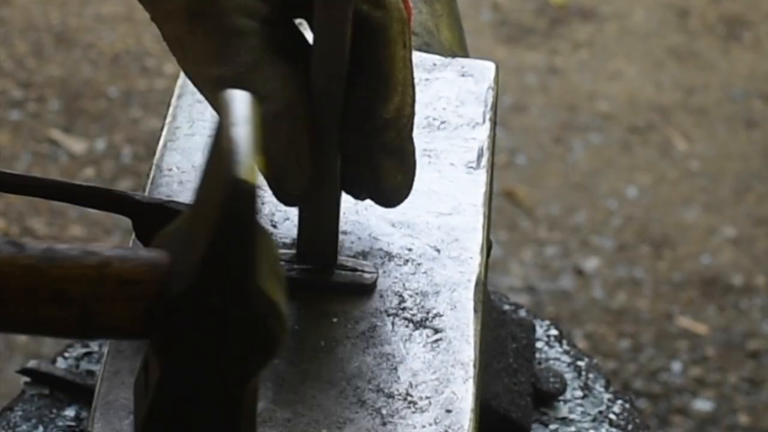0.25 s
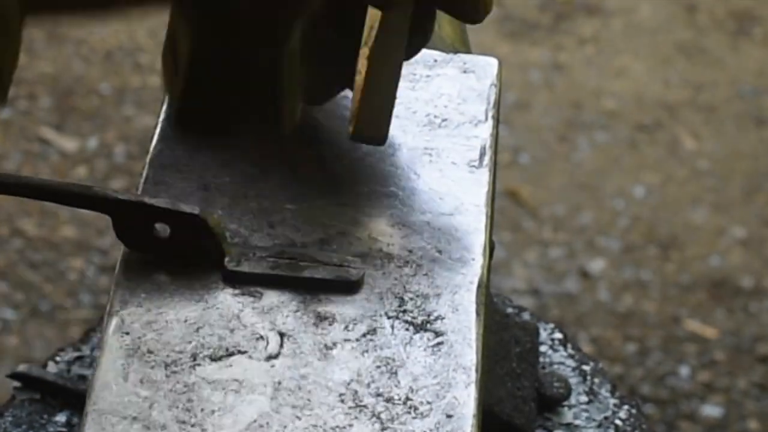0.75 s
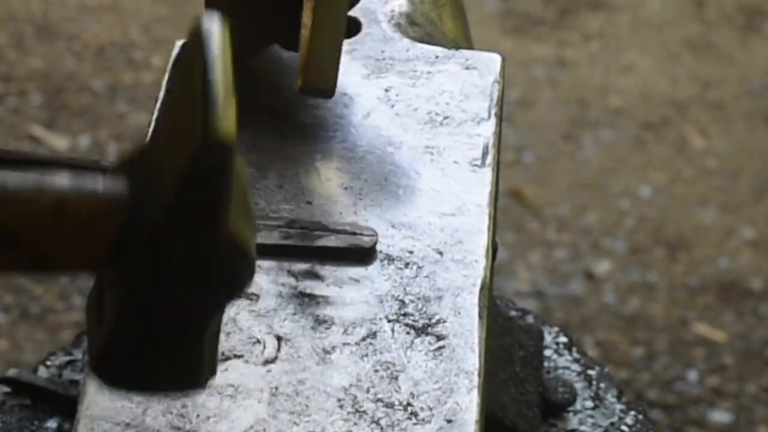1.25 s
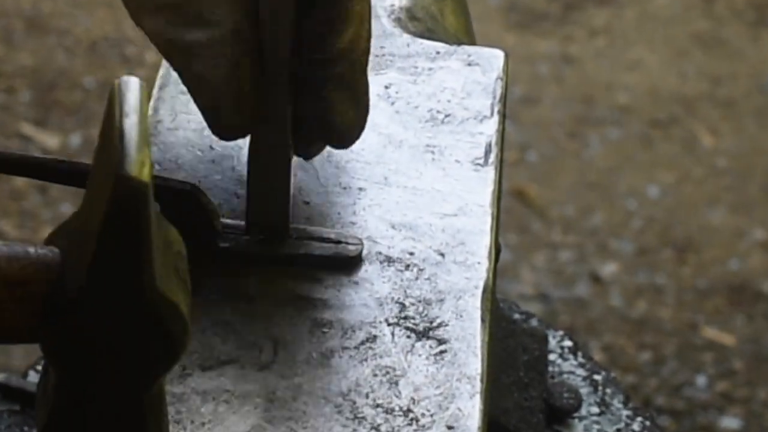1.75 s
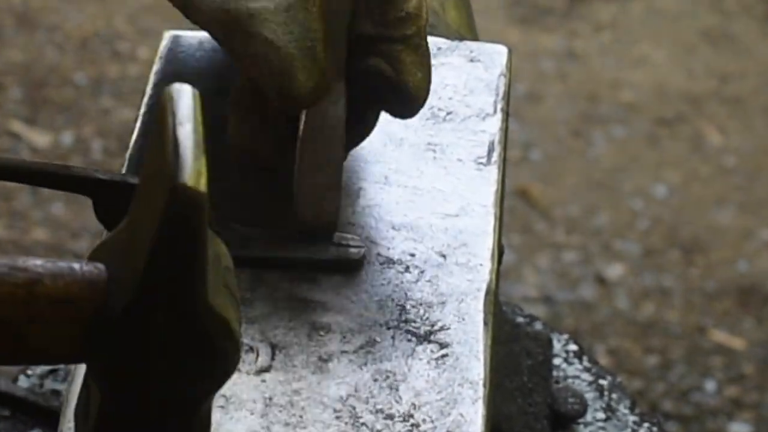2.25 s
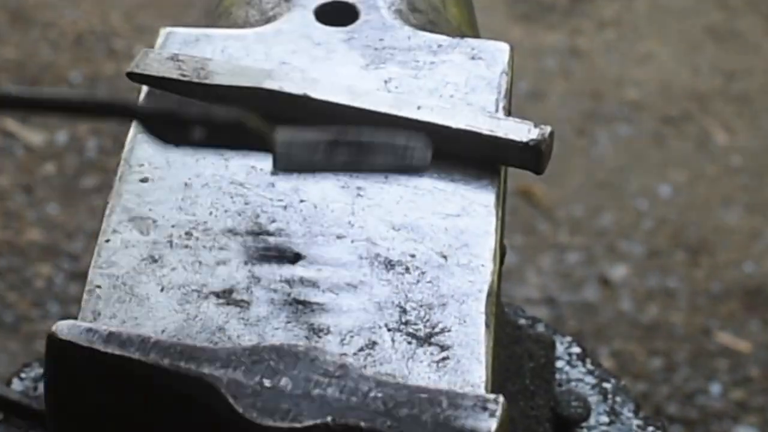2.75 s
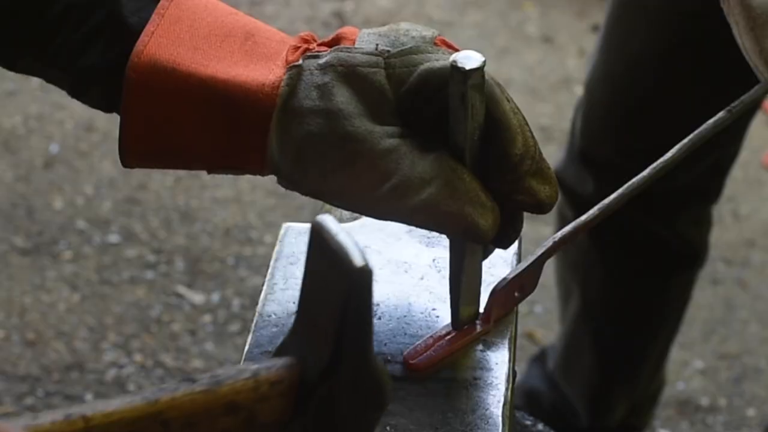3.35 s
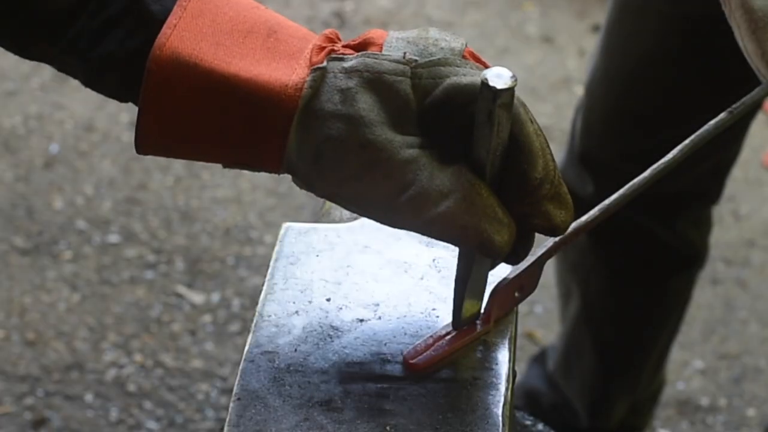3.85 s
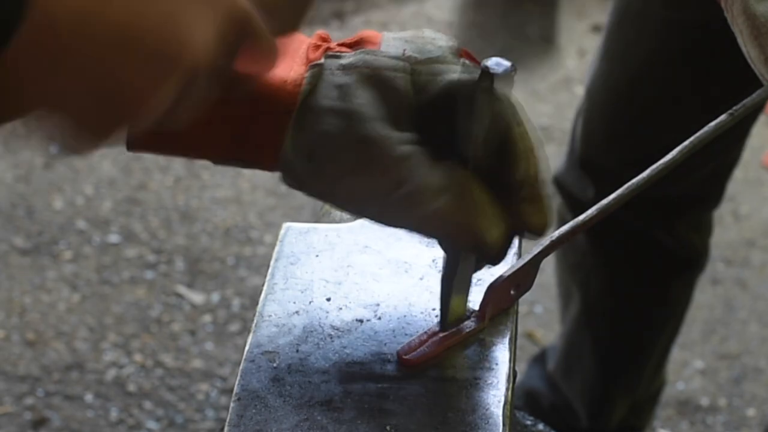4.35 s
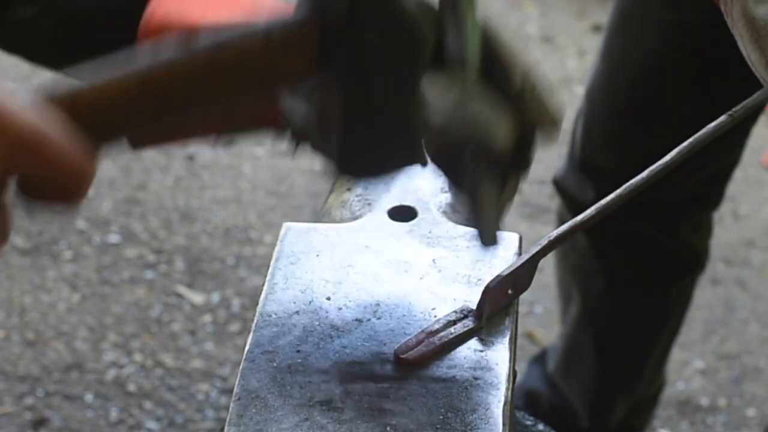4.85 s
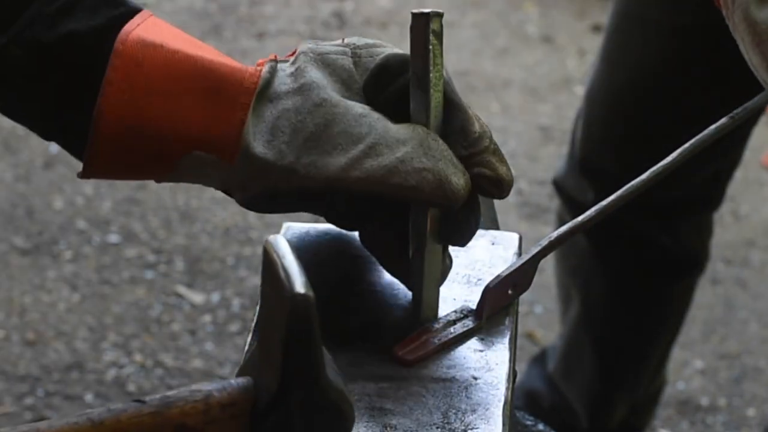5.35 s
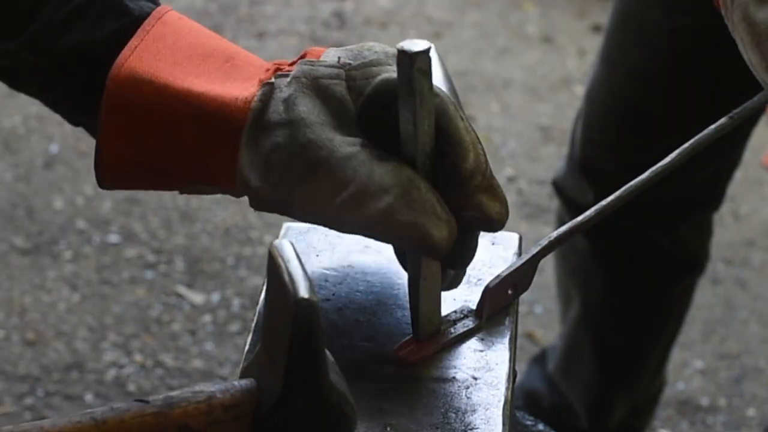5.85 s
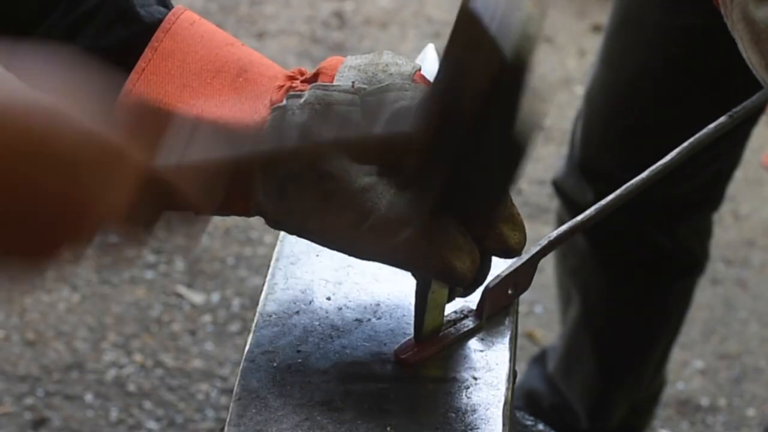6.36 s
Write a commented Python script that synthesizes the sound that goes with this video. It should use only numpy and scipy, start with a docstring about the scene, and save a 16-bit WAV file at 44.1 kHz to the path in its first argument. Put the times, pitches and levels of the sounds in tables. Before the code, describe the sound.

Over thin hiss, a smith taps a chisel and sets down clinking steel; over a low forge roar, three loud anvil strikes and hammer bounces follow.

```python
"""Hammer, hand chisel and anvil

A smith cuts a small steel piece: over hiss and a thin whine a rattle, then seven dry chisel blows, each with
rebounds, and a few clinks; over the forge's low roar three hard, ringing, clipped blows and a bouncing hammer.
Contacts are noise or pulse transients; rings are decaying modes and noise bands; backgrounds are shaped noise
plus unsteady tones."""
import sys
import numpy as np
from scipy import signal
from scipy.fft import rfft, irfft
from scipy.io import wavfile

SR = 44100
rng = np.random.default_rng(int(sys.argv[2]) if len(sys.argv) > 2 else 0)


def store_pcm(level_fs):
    """Save levels as 16-bit WAV."""
    pcm = np.round(np.clip(level_fs, -1, 1) * 32767).astype(np.int16)
    wavfile.write(sys.argv[1], SR, np.atleast_2d(pcm).T)


N = 290619
TIME = np.arange(N) / SR
RING_TIME = np.arange(int(.7 * SR)) / SR
LN_60DB = np.log(1000)

# Table levels are relative; the gains in the functions add to them.
# hammer and chisel modes: f/Hz, level in a hard blow/dB, level in a bounce/dB, t60/s
TOOL_MODES = [(2040, -24, -25, .3), (2110, -28, -26, .36), (2880, -21, -31, .35), (2950, -22, -33, .35),
              (3520, -36, -32, .35), (4312, -33, -34, .35), (5179, -36, -41, .35), (5630, -23, -42, .36),
              (6612, -12, -30, .32), (7020, -17, -56, .33), (8450, -32, -48, .25), (9400, -18, -52, .25),
              (9480, -12, -48, .25), (9570, -19, -51, .25), (9850, -22, -43, .25), (14260, -34, -48, .26)]
# anvil modes: f/Hz, level in a hard blow/dB, level in a bounce/dB, t60/s
ANVIL_MODES = [(690, -17, -38, .27), (740, -16, -33, .27), (818, -21, -30, .25), (1416, -29, -33, .35),
               (1857, -24, -29, .3), (6650, -17, -41, .3), (7610, -32, -52, .28), (7970, -24, -54, .28),
               (8231, -11, -51, .22), (8818, -20, -55, .22), (11245, -22, -53, .22), (11785, -16, -53, .16),
               (12690, -25, -53, .22), (12920, -23, -56, .22), (13220, -21, -53, .17),
               (14063, -16, -62, .17), (14870, -25, -64, .28), (15150, -21, -64, .18)]
# dense ringing after a light contact: f/Hz, level/dB per octave, t60/s
LIGHT_BODY = [(40, -68.5, 0.066), (180, -62.5, 0.025), (350, -32.5, 0.027), (695, -21, 0.026),
              (1400, -23, 0.046), (2817, -24.5, 0.049), (5000, -29.5, 0.056), (9000, -25.5, 0.042),
              (15000, -26, 0.026)]


def undb(db):
    """Decibels to gain."""
    return 10 ** (np.asarray(db) / 20)


def unit(x):
    """Scale to an rms of one."""
    return x / np.sqrt(np.mean(np.abs(x) ** 2))


def along(hz, table, axis=1):
    """Interpolate a table column on a log-frequency axis."""
    rows = np.array(table, float)
    log_hz = np.log(np.maximum(hz, 1))
    return np.interp(log_hz, np.log(rows[:, 0]), rows[:, axis])


def add(track, s, sound):
    """Mix a sound into the track at time s."""
    start = max(int(s * SR), 0)
    track[start:start + len(sound)] += sound[:N - start]


def wander(t, rate_hz):
    """Complex random signal of rms one, interpolated between rate_hz knots a second."""
    knots = np.arange(0, t[-1] + 2 / rate_hz, 1 / rate_hz)
    re, im = rng.standard_normal((2, len(knots)))
    return unit(np.interp(t, knots, re + 1j * im))


def low_cut(x, hz):
    """Second-order high-pass; removes the bass below hz."""
    return signal.sosfilt(signal.butter(2, hz, "high", fs=SR, output="sos"), x)


def swell(rise_s):
    """Exponential build-up of reflections."""
    return 1 - np.exp(-RING_TIME / rise_s)


def dense_ring(table, tilt_db_per_octave=0):
    """Countless overlapping modes: half-octave-spaced noise bands, each dying at its own rate."""
    size = len(RING_TIME)
    noise = rfft(rng.standard_normal(size))
    octave = np.log2(np.maximum(np.fft.rfftfreq(size, 1 / SR), 1))
    out = 0
    for hz in 1000 * 2 ** np.arange(-5, 4.5, .5):
        share = np.maximum(1 - 2 * np.abs(octave - np.log2(hz)), 0)
        band = unit(irfft(noise * share, size))
        level_db = along(hz, table) + tilt_db_per_octave * np.log2(hz / 2000)
        fade = np.exp(-LN_60DB * RING_TIME / along(hz, table, axis=2))
        out = out + band * undb(level_db) * fade
    return out / np.sqrt(3)  # overlapping bands: unit power per octave at 0 dB


def ring(modes, scatter=0, scatter_rate_hz=70):
    """Sum of decaying modes (f/Hz, level/dB, t60/s); reflections make each flutter by the share scatter."""
    out = 0
    for hz, db, t60_s in modes:
        phase = np.exp(2j * np.pi * rng.random())
        flutter = (phase + scatter * wander(RING_TIME, scatter_rate_hz)) / np.hypot(1, scatter)
        mode = np.exp((2j * np.pi * hz - LN_60DB / t60_s) * RING_TIME)
        out = out + undb(db) * np.imag(flutter * mode)
    return out


def excited(modes, axis, tilt_db_per_octave=0):
    """Pick the levels for one kind of blow; a harder contact favours the high modes."""
    return [(row[0], row[axis] + tilt_db_per_octave * np.log2(row[0] / 2000), row[-1]) for row in modes]


def colour(push, spectrum):
    """Filter a push with the minimum-phase response of a spectrum; unit energy."""
    size = 2048
    gain = undb(along(np.fft.rfftfreq(size, 1 / SR), spectrum))
    cepstrum = irfft(np.log(gain))
    # fold the cepstrum so that the response is causal
    cepstrum[1:size // 2] *= 2
    cepstrum[size // 2 + 1:] = 0
    response = irfft(np.exp(rfft(cepstrum)))[:size // 2]
    out = np.convolve(push, response)
    return out / np.sqrt(np.sum(out ** 2))


def crack(length_s):
    """Steel chatters on steel: a brief burst of random signs, coloured."""
    # first contact: f/Hz, level/dB
    spectrum = [(30, -14), (150, -8.5), (400, 5), (700, 1.5), (1400, -10), (3000, -1), (7000, -1),
                (15000, -2.5)]
    t = RING_TIME[:256]
    chatter = np.sign(rng.standard_normal(len(t)))
    return colour(chatter * np.exp(-(t / length_s) ** 4), spectrum)


def rattle(s, hop_s, db, count=4):
    """Contacts (t/s, level/dB) of a rebound: every hop is shorter, every contact weaker."""
    hop_share, hop_loss_db = .55, 4.0
    for k in range(count):
        yield s, db - k * hop_loss_db
        s = s + hop_s * hop_share ** k


def background(spectrum, db, resonances, tones, waver, low_hz):
    """Rushing air, coloured by resonances, with slightly unsteady tones."""
    hz = np.fft.rfftfreq(N, 1 / SR)
    shape_db = along(hz, spectrum)
    for f, width_hz, gain_db in resonances:
        shape_db = shape_db + gain_db / (1 + (2 * (hz - f) / width_hz) ** 2)
    noise = irfft(rfft(rng.standard_normal(N)) * undb(shape_db), N)
    air = unit(low_cut(noise, low_hz))
    out = air * undb(db + 0.58 * wander(TIME, rate_hz=19).real)
    for f, tone_db in tones:
        unsteady = 1 + waver * wander(TIME, rate_hz=16)
        out = out + np.sqrt(2) * undb(tone_db) * np.real(unsteady * np.exp(2j * np.pi * f * TIME))
    return out


def hiss():
    """Shaped noise and a thin whine of three tones."""
    # noise: f/Hz, level/dB per Hz
    spectrum = [(60, -54.5), (150, -28), (240, -17), (400, -11.5), (510, -5), (750, -4.5), (1100, -9.5),
                (1900, -8.5), (2600, -3.5), (3300, -10.5), (6000, -15), (9000, -17), (12500, -24.5),
                (15500, -26)]
    # resonances: f/Hz, width/Hz, gain/dB
    resonances = [(2440, 200, 2.5), (2950, 380, 4.2), (3750, 400, 7.5), (3900, 120, 2), (5080, 420, 8),
                  (6160, 270, 4.4), (10100, 200, 4.85), (10600, 190, 4.3)]
    # whine: f/Hz, level/dB
    tones = [(959, -57.5), (2826, -52.5), (8484, -61)]
    return background(spectrum, -46.2, resonances, tones, waver=0.25, low_hz=159.6)


def forge_roar():
    """Low shaped noise of the forge and the tones of its blower."""
    # noise: f/Hz, level/dB per Hz
    spectrum = [(15, -46), (25, -15.5), (112, -5.5), (243, -10), (354, -4.5), (558, -13.5), (790, -10),
                (927, -19.5), (1030, -12.5), (1150, -22), (1280, -15.5), (1630, -25), (2070, -24.5),
                (2300, -29), (15000, -54)]
    # resonances: f/Hz, width/Hz, gain/dB
    resonances = [(304, 27, 5.5), (481, 40, 6), (1221, 25, 3), (1730, 35, 4), (2020, 80, 3), (2920, 200, 5),
                  (6900, 1200, 0), (9800, 1770, 5), (14500, 3600, -5.5)]
    # blower: f/Hz, level/dB
    tones = [(118.4, -56), (354, -50.5), (501, -55.5), (1061, -53)]
    return background(spectrum, -42.7, resonances, tones, waver=0.28, low_hz=25)


def clinks():
    """The loose chisel touches the anvil and rings in two high modes; brushing steel only pings."""
    # touches: t/s, tick/dB, ring/dB
    touches = [(2.779, -15.5, -47), (2.793, -18, -43), (2.802, -10, -30), (2.8736, -21, -32),
               (2.879, -15, -26)]
    # loose chisel: f/Hz, level/dB, t60/s
    loose_modes = [(7140, -1.5, .035), (13900, 2, .04)]
    # faint pings of steel brushing steel: t/s, level/dB, f/Hz
    pings = [(2.7455, -41, 8330), (2.7550, -35, 8330), (5.0730, -48, 3030)]
    out = np.zeros(N)
    for s, tick_db, ring_db in touches:
        add(out, s, undb(tick_db) * low_cut(crack(length_s=.0008), hz=2200))
        body = dense_ring(LIGHT_BODY, tilt_db_per_octave=3.0)
        add(out, s, undb(tick_db - 8.0) * low_cut(body, hz=700))
        add(out, s, undb(ring_db) * ring(loose_modes, scatter=1.1, scatter_rate_hz=610))
    for s, db, hz in pings:
        add(out, s, ring([(hz, db, 0.054)]))
    return out


def bounces():
    """The hammer falls on the bare face: one push and pull of air, a near reflection, then the ring."""
    # contacts: t/s, level/dB, ring brightness/dB per octave
    contacts = [(5.1548, 1, -1.4), (5.3179, -0.5, 0.3), (5.4157, -3.5, -0.3), (5.4833, -7.5, -0.5),
                (5.5235, -12, -3)]
    # first contact: f/Hz, level/dB
    spectrum = [(40, -26), (200, -19), (500, 2), (900, -1), (2000, 2), (3300, 10.5), (5000, 10.5),
                (9000, -15), (15000, -25)]
    # dense ringing: f/Hz, level/dB per octave, t60/s
    body_table = [(60, -43, .1), (201, -32, 0.059), (393, -10.5, 0.038), (816, -33.5, 0.022),
                  (1700, -6, 0.053), (2960, -34, 0.018), (5030, -19, 0.064), (8850, -59, 0.041),
                  (15000, -59, .05)]
    # workshop reverberation: f/Hz, level/dB per octave, t60/s
    room_table = [(40, -47, 0.36), (128, -28.5, 0.33), (350, -41.5, 0.63), (600, -50, 0.48),
                  (1400, -31.5, 0.44), (2800, -35, 0.43), (5000, -37.5, 0.36), (9000, -57, .33),
                  (15000, -68, .28)]
    reflection_s = .0044
    out = np.zeros(N)
    t = (RING_TIME[:64] - .0003) / .00011
    snap = np.abs(t) == np.abs(t).min()  # single sample at the centre
    push = colour(-t * np.exp(-t ** 2 / 2) + .5 * snap, spectrum)
    for s, db, tilt_db in contacts:
        add(out, s, undb(db + 10.0) * push)
        add(out, s + reflection_s, undb(db - 0.5) * push)
        body = swell(rise_s=0.0012) * dense_ring(body_table)
        room = swell(rise_s=0.01) * dense_ring(room_table)
        add(out, s, undb(db) * (body + room))
        # the handle soon damps the head; the room carries the rest
        handle = undb(-2 + 12.6 * np.exp(-RING_TIME / 0.017))
        modes = excited(TOOL_MODES + ANVIL_MODES, axis=2, tilt_db_per_octave=tilt_db)
        ring_db = -2.5 + 0.98 * db  # the ring follows the strength of the bounce
        add(out, s, undb(ring_db) * handle * ring(modes, scatter=2.3, scatter_rate_hz=117))
    return out


def light_blows():
    """The gloved hand damps the chisel: a push, a crack, a very short ring, then smaller rebounds."""
    # blows: t/s, crack/dB, push/dB, knock of the work/dB, chisel ring/dB
    blows = [(.3960, 2.5, -2, -13.5, -3.5), (.7980, -2.5, -6, .5, -5.5), (1.2843, -3.5, -35, 2.5, 0),
             (1.5711, 4.5, -2.5, -5.5, 2), (1.934, 3, -6.5, -3.5, 1), (2.2350, 0, -3, 1, 2),
             (2.5330, 1.5, -7, -4, 5)]
    # hammer rattling on the chisel, once at the start and after each blow: t/s, first hop/s, level/dB
    rattles = [(0.0154, 0.014, -10), (0.4503, 0.017, -9.5), (0.8604, .0127, -11), (1.3425, .0128, -10),
               (1.6269, .0142, -10.5), (1.9936, .0117, -11), (2.2900, .0162, -8), (2.5798, 0.014, -10)]
    # work knocking on the anvil: f/Hz, level/dB, t60/s
    knock_modes = [(707, -22, 0.041), (1158, -27, 0.041), (1370, -30, 0.029)]
    # chisel pressed on the work: f/Hz, level/dB, t60/s
    held_modes = [(1936, -17.5, 0.022), (2130, -27, 0.043), (2450, -29.5, 0.02), (2833, -32.5, .05),
                  (3380, -28.5, 0.043), (3865, -25.5, 0.028), (5640, -27.5, 0.047)]
    out = np.zeros(N)
    push = RING_TIME / .0003 * np.exp(-RING_TIME / .0003)
    for s, crack_db, push_db, knock_db, ring_db in blows:
        add(out, s, undb(crack_db + 5.0) * low_cut(crack(length_s=0.0016), hz=740))
        add(out, s, undb(push_db - 12.5) * low_cut(push, hz=92))
        modes = undb(knock_db) * ring(knock_modes) + undb(ring_db) * ring(held_modes)
        body_db = 1.1 + .45 * knock_db  # the dense ring grows with the knock
        body = undb(body_db) * dense_ring(LIGHT_BODY, tilt_db_per_octave=0.86)
        add(out, s, swell(rise_s=0.00025) * (body + modes))
    for start_s, hop_s, first_db in rattles:
        for s, db in rattle(start_s, hop_s, first_db):
            body = dense_ring(LIGHT_BODY, tilt_db_per_octave=1.5)
            add(out, s, undb(db - 4.5) * low_cut(body, hz=400))
            add(out, s, undb(db + 4.5) * low_cut(crack(length_s=0.00037), hz=895))
    ceiling = 0.97
    return out / (1 + (out / ceiling) ** 4) ** .25  # rounds off the sharpest peaks


def hard_blows():
    """A full swing rings hammer, chisel and anvil, rocks the stand and fills the workshop."""
    # blows: t/s, thud/dB, tool ring/dB, brightness/dB per octave, ring length/s
    blows = [(4.1826, 3, 0, -2.5, .225), (4.4559, 2, -0.5, -2.5, .252), (4.779, 3.5, -7.5, -1.7, .4)]
    # dense ringing: f/Hz, level/dB per octave, t60/s
    body_table = [(35, -25, 0.067), (101, -24, 0.085), (307, -18.5, 0.16), (690, -11, 0.1),
                  (1340, -10.5, 0.072), (2800, -9.5, 0.1), (5000, -16, 0.23), (10200, -8, 0.27),
                  (15100, -21, .12)]
    # workshop reverberation: f/Hz, level/dB per octave, t60/s
    room_table = [(40, -45.5, 0.29), (181.3, -23, 0.25), (400, -21, 0.41), (800, -26, 0.45),
                  (1400, -21, 0.35), (2800, -20, 0.41), (5000, -19, 0.38), (9950, -27, .38),
                  (15000, -33.5, 0.35)]
    # anvil rocking on its stand: f/Hz, level/dB, t60/s
    stand_modes = [(58.9, -26, 0.31), (92, -21, 0.27), (135.5, -10.5, 0.19), (193.7, -13.5, 0.26),
                   (236.5, -13.5, 0.29), (321.4, -24.5, .3), (425, -21.5, .28), (560.4, -25.5, 0.26),
                   (640, -21.5, 0.26)]
    blow_db, anvil_db = -2, -4.5
    out = np.zeros(N)
    for s, thud_db, tool_db, tilt_db, length_s in blows:
        body = dense_ring(body_table, tilt_db)
        room = swell(rise_s=.015) * dense_ring(room_table, tilt_db)
        # the tools shriek until the grip damps them; the room carries the rest
        grip = undb(-1.5 + 10.0 * np.exp(-RING_TIME / 0.016))
        tool_ring = ring(excited(TOOL_MODES, axis=1), scatter=2.2, scatter_rate_hz=170)
        tools = undb(tool_db) * grip * tool_ring
        anvil_ring = ring(excited(ANVIL_MODES, axis=1), scatter=.4, scatter_rate_hz=130)
        anvil = undb(anvil_db) * anvil_ring
        stand_ring = ring(stand_modes, scatter=0.62, scatter_rate_hz=55)
        thud = undb(thud_db) * swell(rise_s=0.016) * stand_ring
        ending = np.clip((length_s - RING_TIME) / .012, 0, 1)
        add(out, s, undb(blow_db) * (body + room + tools + anvil + thud) * ending)
        add(out, s, undb(blow_db + 13.5) * crack(length_s=0.0019))
    return out


def scene():
    """Hiss gives way to the forge's roar under the blows; the level dips briefly twice."""
    # dips: t/s, half width/s, depth/share
    dips = [(5.000, 0.0097, 0.83), (5.701, 0.0071, 0.87)]
    forge_start_s, fade_s = 3.395, 0.008
    roar = np.clip((TIME - forge_start_s) / fade_s, 0, 1)
    mix = (1 - roar) * hiss() + roar * forge_roar()
    mix = mix + clinks() + bounces() + light_blows() + hard_blows()
    for s, width_s, depth in dips:
        mix = mix * (1 - depth * np.exp(-((TIME - s) / width_s) ** 4))
    return mix[None]


def record(dry):
    """Overload clips the mix at full scale; an elliptic low-pass then cuts the top."""
    top_hz = 16200
    clipped = np.clip(dry, -1, 1)
    return signal.sosfilt(signal.ellip(8, .2, 70, top_hz, fs=SR, output="sos"), clipped)


dry = scene()
out = record(dry)
store_pcm(out)
```